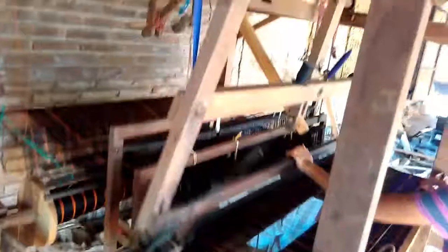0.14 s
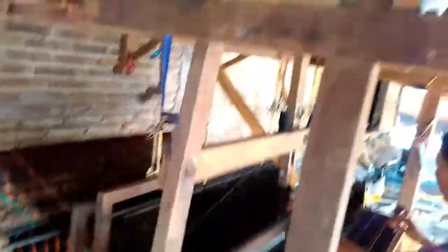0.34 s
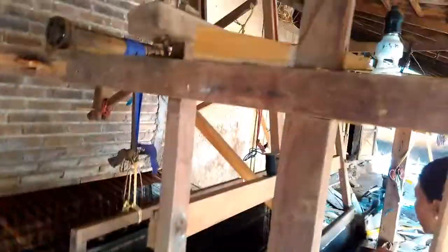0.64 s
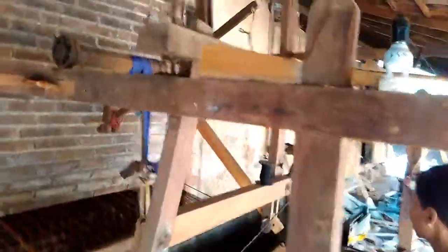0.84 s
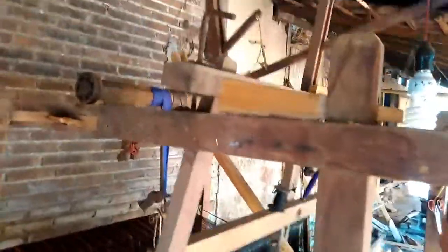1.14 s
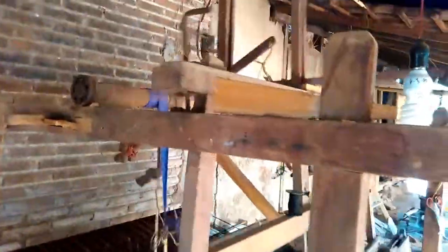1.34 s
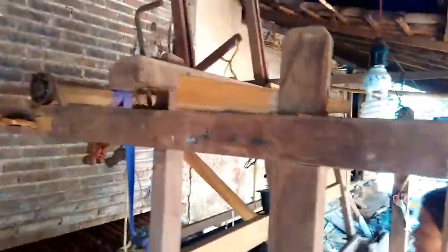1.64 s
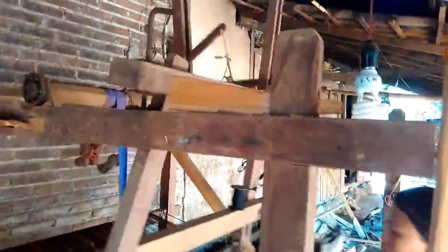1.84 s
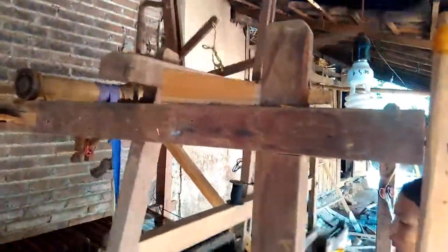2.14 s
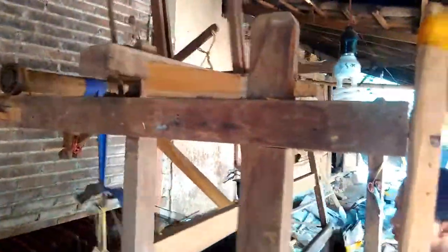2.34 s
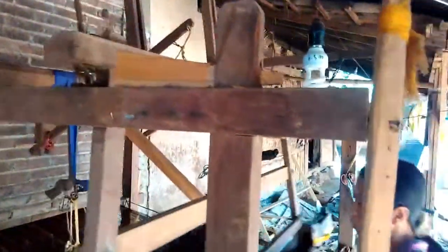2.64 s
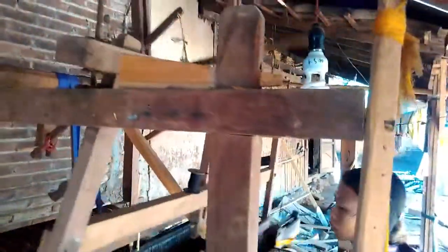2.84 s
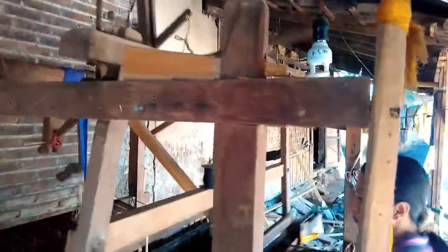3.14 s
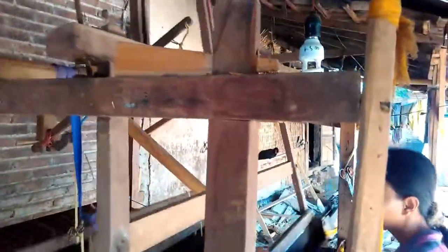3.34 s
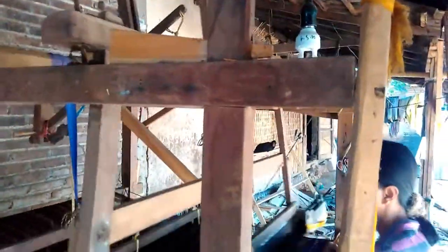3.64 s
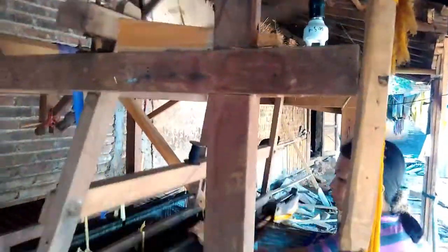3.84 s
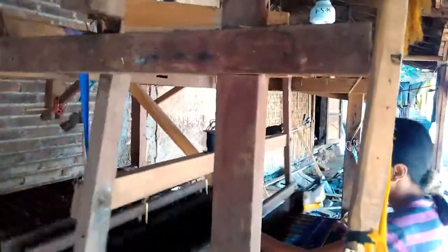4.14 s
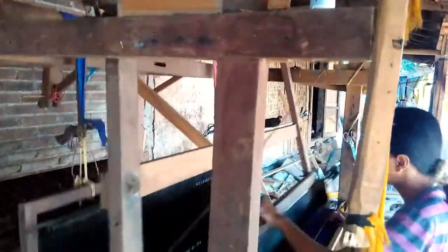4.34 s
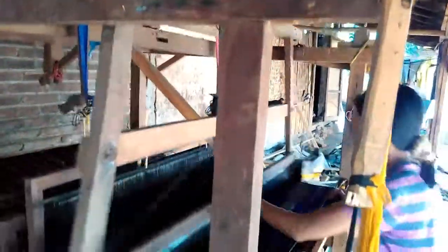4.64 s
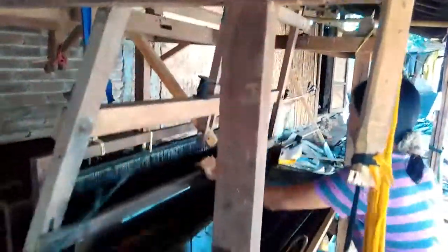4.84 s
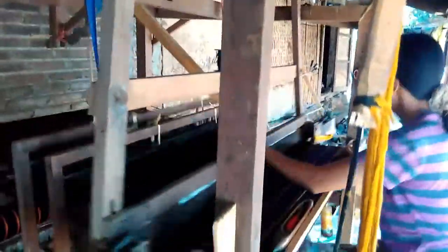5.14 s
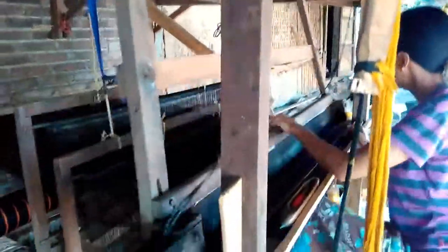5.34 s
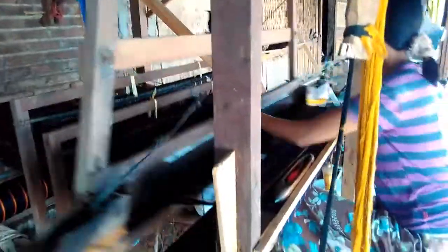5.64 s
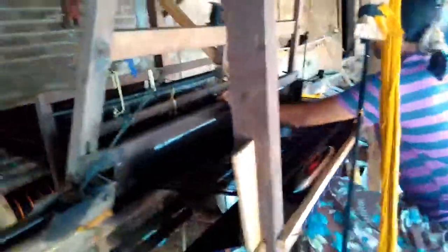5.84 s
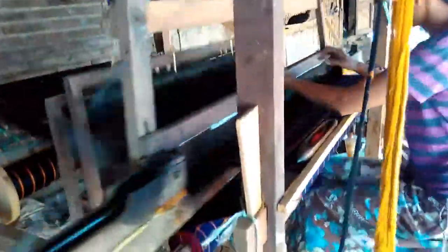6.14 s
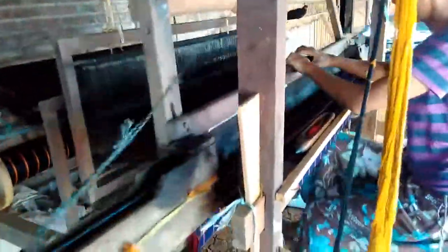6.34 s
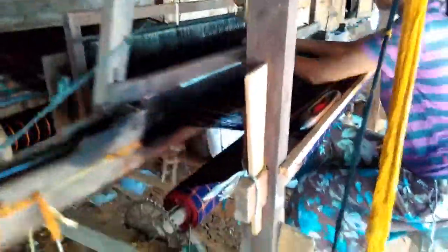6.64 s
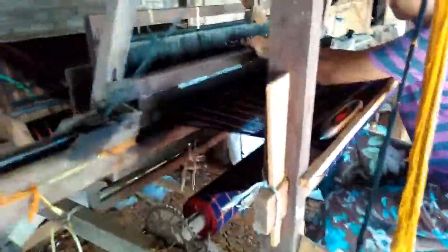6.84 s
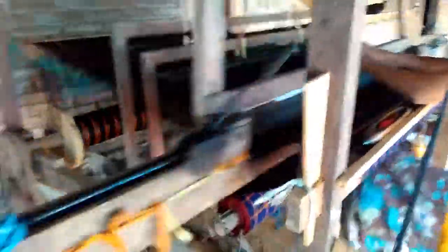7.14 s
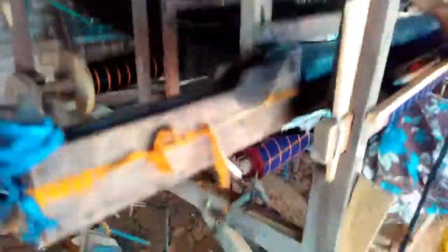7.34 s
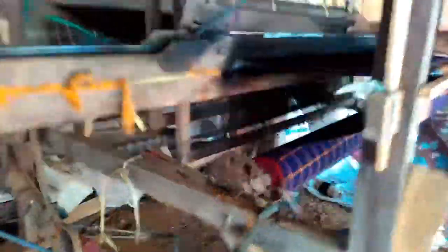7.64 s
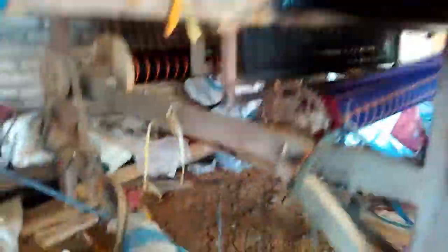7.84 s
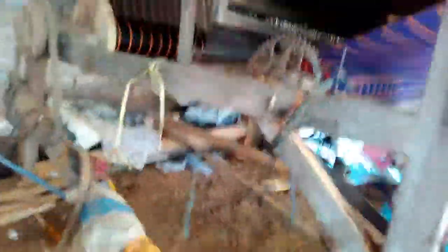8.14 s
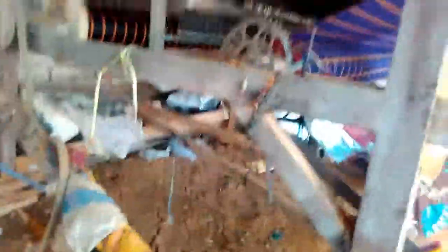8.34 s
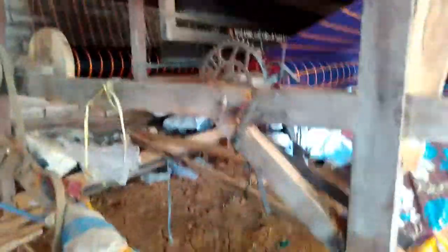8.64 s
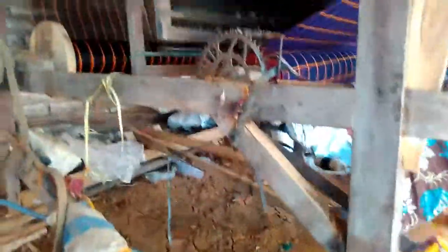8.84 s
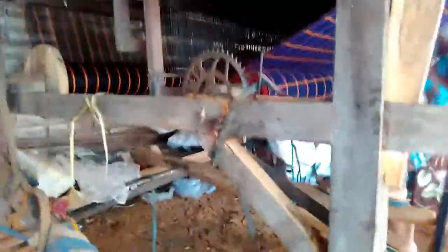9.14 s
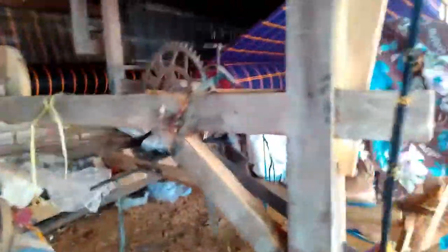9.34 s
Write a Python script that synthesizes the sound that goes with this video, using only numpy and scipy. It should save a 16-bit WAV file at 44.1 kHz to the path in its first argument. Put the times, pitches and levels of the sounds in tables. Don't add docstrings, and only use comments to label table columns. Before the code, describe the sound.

Fast, regular loom work, very close and dry with a short brick-room tail. Each cycle goes knock, skitter, sharp crack, then a heavier wooden slam with a quick double or triple clatter, then small ticks and a treadle drop. Steel reed and shuttle tip add brief high ringing. Quiet outdoor air fills the gaps, a distant low motor swelling later; stereo phone pickup distorts on peaks.

```python
import sys
import numpy as np
from scipy import signal
from scipy.fft import rfft, irfft
from scipy.io import wavfile
from scipy.ndimage import uniform_filter1d

SR = 44100
rng = np.random.default_rng(int(sys.argv[2]) if len(sys.argv) > 2 else 0)


def output_pcm(signal):
    pcm = np.clip(np.atleast_2d(signal).T, -1, 1) * 32767
    wavfile.write(sys.argv[1], SR, np.round(pcm).astype(np.int16))


def boost_factor(decibels):
    exponent = np.asarray(decibels, float) / 20
    return 10 ** exponent


N = 418068

# pitch_hz, t60_s
WIRES = [(7288, .12), (8226, .06), (8851, .12), (9834, .07), (11000, .06), (11548, .08), (12350, .07),
         (13071, .08), (13389, .09), (14149, .04)]
# start_s, blow_db, steel_re_wood_db, chatter_t60_s
LANDING = [
    (0.166, -7.5, 1.5, 0.18),
    (1.124, -1.5, -3.5, 0.14),
    (2.0936, -8.5, 2, 0.17),
    (3.043, 0, -2.5, 0.13),
    (4.01, -5.5, 0.5, 0.12),
    (4.974, 1, -5.5, 0.11),
    (5.939, -7.5, 0, 0.24),
    (6.89, 2.5, -3, 0.054),
    (7.863, 0.5, -3, 0.033),
    (8.817, -0.5, -2.5, 0.12),
]
# start_s, blow_db, steel_re_wood_db, chatter_t60_s
SLAM = [
    (.404, 0, -20.5, 0.1),
    (2.337, -1.5, -1.5, 0.087),
    (4.243, 1, -1, 0.067),
    (6.184, 0.5, -2.5, 0.06),
    (8.109, 0.5, -6.5, 0.094),
]


def unit(x):
    return x / np.sqrt(np.mean(x ** 2) + 1e-20)


def colour(x, points):
    size = 1024
    hz, db = np.transpose(points)
    bins_hz = np.maximum(np.fft.rfftfreq(size, 1 / SR), 1)
    gain_db = np.interp(np.log(bins_hz), np.log(hz), db)
    cep = irfft(np.log(boost_factor(gain_db)))
    cep[1:size // 2] *= 2
    cep[size // 2 + 1:] = 0
    taps = irfft(np.exp(rfft(cep)))[:size // 2]
    return signal.oaconvolve(x, taps[None] / np.linalg.norm(taps), axes=1)[:, :N]


def butter(x, order, hz, kind):
    return signal.sosfilt(signal.butter(order, hz, kind, fs=SR, output="sos"), x)


def fade(t, t60_s):
    return np.exp(-np.log(1000) * t / t60_s)


def curve(rows):
    start_s, level_db = np.transpose(rows)
    return np.interp(np.arange(N) / SR, start_s, level_db)


def wander(hold):
    held = np.repeat(rng.standard_normal(N // hold + 1), hold)[:N]
    return uniform_filter1d(held, hold // 2)


def grit(shape, spread_db):
    jumps = np.minimum(rng.exponential(size=(shape[0], shape[1] // 48 + 1)), 3)
    sizes = boost_factor(np.minimum(spread_db, 3) * jumps)
    return unit(rng.standard_normal(shape) * np.repeat(sizes, 48, axis=1)[:, :shape[1]])


def ring(modes, t, scatter_db, detune):
    hz, t60_s = np.transpose(modes)[:, :, None]
    size, slip = rng.standard_normal((2, len(modes), 1))
    phase = rng.uniform(0, 2 * np.pi, (2, len(modes), 1))
    waves = np.sin(2 * np.pi * hz * (1 + detune * slip) * t + phase)
    out = np.sum(boost_factor(scatter_db * size) * fade(t, t60_s) * waves, axis=1)
    return out / np.linalg.norm(out, axis=1, keepdims=True)


def outdoor_air(loom):
    # pitch_hz, level_db
    air_gain = [(30, 5), (87, 11.5), (346, 17.5), (978, 5.5), (1200, 4), (5170, -10), (11000, 0.5),
                (14500, -11)]
    air = boost_factor(-41.5) * colour(rng.standard_normal((2, N)), air_gain)
    duck_db, duck_above_db, duck_s = -6.5, -30.5, 0.091
    busy = uniform_filter1d(np.abs(loom[0]), int(duck_s * SR)) / boost_factor(duck_above_db)
    gust_db = 2.5 * wander(SR // 12)
    bass_gain = boost_factor(duck_db * busy / (1 + busy) + gust_db - 2.5)
    return bass_gain * butter(air, 2, 450, "low") + butter(air, 2, 450, "high")


def drone():
    # start_s, level_db
    swell = [(5.3, -58), (5.6, -57), (5.95, -55), (6.25, -54), (6.4, -43.5), (6.85, -41), (7.1, -62),
             (7.45, -47), (7.8, -52), (8.0, -59), (8.6, -57), (9.1, -60), (9.3, -44), (9.48, -45)]
    pitch_hz = 167.5
    return boost_factor(curve(swell)) * np.sin(2 * np.pi * pitch_hz * np.arange(N) / SR)


def shaking():
    shake_db = [-34, -29.5, -28, -33, -35, -61, -34, -29, -51, -27]
    flight_s = 0.1
    rest_db, rest_lead_s, swing_s = -57, 0.12, 0.14
    picks_s = [row[0] - flight_s for row in LANDING]
    rows = []
    for start_s, peak_db in zip(picks_s, shake_db):
        rows += [(start_s - rest_lead_s, rest_db), (start_s + swing_s, peak_db)]
    next_pick_s = 2 * picks_s[-1] - picks_s[-2]
    return rows + [(next_pick_s - rest_lead_s, rest_db)]


def rattle(wood_gain, steel_gain):
    hold = int(SR / 70)
    wood_db = 6.2 * wander(hold) - 6.5
    steel_db = 6.6 * wander(hold) - 2.5
    wood = boost_factor(wood_db) * colour(grit((2, N), spread_db=7.6), wood_gain)
    steel = boost_factor(steel_db) * colour(grit((2, N), spread_db=8.5), steel_gain)
    return boost_factor(curve(shaking())) * (wood + steel)


def strikes():
    # start_s, blow_db, steel_re_wood_db, chatter_t60_s
    picker = [
        (.065, -20.5, -7, 0.28),
        (1.031, -16, -4, 0.15),
        (1.992, -17, -6, 0.21),
        (2.946, -14.5, -9, 0.073),
        (3.909, -19.5, -6, 0.4),
        (4.884, -18.5, -14, 0.074),
        (5.837, -22.5, -7, 0.5),
        (7.759, -20.5, -2, 0.24),
        (8.724, -18, -2.5, 0.27),
    ]
    # start_s, blow_db, steel_re_wood_db, chatter_t60_s
    race = [(.105, -14.5, -4.5, 0.043), (1.054, -17.5, -14, 0.23), (1.1, -23, -28, 0.076),
            (2.03, -17, -9.5, 0.042), (2.966, -18.5, -10, 0.24), (3.003, -19, -12, 0.1),
            (3.948, -18, -7.5, 0.079), (4.899, -18.5, -14, 0.3), (4.932, -24, -4, 0.13),
            (4.955, -15.5, -27, 0.061), (5.877, -23, -4, 0.22), (6.817, -17.5, -19, 0.2),
            (6.846, -22.5, 3, 0.069), (6.872, -21, -23, 0.13), (7.798, -15.5, -11, 0.096),
            (7.834, -28.5, 0, 0.75), (8.774, -15.5, -14, 0.05), (8.795, -26, -34, 0.21)]
    # start_s, blow_db,
    # steel_re_wood_db, chatter_t60_s
    rebound = [(.225, -14.5, -1, 0.01), (1.176, -30, -5, 0.053), (1.236, -34, 10, .06),
               (2.116, -9, -15, 0.11), (2.179, -29.5, 8, 0.076), (3.161, -25.5, 6, 0.13),
               (4.04, -5, -1.5, 0.035), (5.103, -23.5, 5, .06), (6.028, -24, 4, 0.17),
               (6.795, -15, 1.5, 0.1), (7.002, -21, 5, 0.041), (7.97, -21, 6, 0.018),
               (8.875, -15, 3, 0.091), (8.911, -17, -19, 0.19)]
    # start_s, blow_db, steel_re_wood_db, chatter_t60_s
    skew = [
        (1.361, -10.5, -19, 0.28),
        (1.374, -12.5, -1, 0.33),
        (3.289, -12, -29, 0.2),
        (3.303, -11.5, -3.5, 0.42),
        (5.227, -10.5, -6, 0.28),
        (5.236, -15.5, 2.5, 0.53),
        (7.126, -11, -23, 0.34),
        (7.147, -6, -0.5, 0.12),
        (9.059, -11, -31, 0.081),
        (9.074, -10.5, -5.5, 0.31),
    ]
    # start_s, blow_db, steel_re_wood_db, chatter_t60_s
    cap = [(.255, -25.5, 8, .12), (.454, -1, -7, 0.17), (.541, -5.5, -11, 0.055), (1.421, -6, -4, .25),
           (2.38, -4.5, -4.5, 0.17), (3.337, -5, -8, 0.3), (4.285, -5.5, -3, 0.26),
           (5.279, -10.5, -22, 0.65), (6.222, -6, -4.5, 0.35), (6.315, -10, -3, 0.13),
           (7.191, -0.5, -2.5, 0.042), (8.147, -5, -4.5, 0.25), (8.242, -8.5, -8, 0.11),
           (9.12, -5.5, -4.5, 0.15), (9.206, -15, -15, 0.2)]
    # start_s, blow_db, steel_re_wood_db, chatter_t60_s
    bounce = [(.501, -4, -5.5, .06), (1.5, -10.5, -10.5, 0.18), (2.426, -7, -17, 0.1),
              (2.458, -10.5, -12, 0.22), (3.425, -10.5, -21, 0.11), (3.443, -13, -9, 0.1),
              (4.339, -7, -15, 0.076), (4.357, -7, -9.5, 0.13), (5.337, -13, -12, 0.11),
              (6.276, -12.5, -5, 0.19), (6.333, -13, -8, 0.1), (7.277, -14, -12, 0.25),
              (8.202, -12, -3.5, 0.24), (9.136, -24, -20, 0.38), (9.178, -20, -21, 0.26)]
    # start_s, blow_db, steel_re_wood_db, chatter_t60_s
    treadle = [
        (.7265, -20.5, -7.5, 0.18),
        (1.687, -31, 2.5, 0.15),
        (2.647, -26, -3, 0.17),
        (3.597, -29.5, -1, 0.23),
        (4.568, -19, -9, 0.14),
        (5.526, -31.5, -2, 0.33),
        (6.492, -17.5, -7, 0.1),
        (7.468, -30.5, -2, 0.17),
        (8.424, -19.5, -11, 0.16),
        (9.404, -37, 2, 0.076),
    ]
    # start_s, blow_db, steel_re_wood_db, chatter_t60_s
    snaps = [(.4065, -4.5, 1, 0.018), (.482, -10, -20, .03), (.192, -11, -7, 0.094), (5.003, -8, -8, .04),
             (1.176, -14.5, 2.5, 0.05), (2.408, -3.5, -9, 0.011), (3.095, -18, 4.5, 0.083),
             (4.358, -5, -7, 0.021), (4.395, -14.5, -5, 0.046), (5.033, -14, -4, 0.037),
             (5.879, -28, -15, .02), (6.052, -37, 5, 0.018), (6.18, -11, -21, 0.046),
             (6.343, -16, -20, 0.057), (6.818, -10.5, -12, 0.02), (6.945, -15.5, -5, 0.054),
             (8.796, -16, -25, 0.014), (8.876, -13.5, -1, 0.024), (9.078, -8, -13, 0.018),
             (4.582, -29, -23, 0.099), (1.932, -41, -20, 0.037)]
    # start_s, knock_db, chatter_t60_s
    slats = [(.336, -25.5, 0.19), (1.259, -26, 0.23), (1.303, -27, 0.33), (2.56, -37, 0.96),
             (2.603, -28, 0.25), (2.627, -27, 0.067), (3.222, -22.5, 0.098), (3.56, -28, 0.26),
             (4.486, -36, 0.14), (4.497, -33.5, 0.49), (4.551, -29, 0.17), (5.15, -26, 0.23),
             (5.47, -50, 0.065), (5.485, -36, 0.25), (8.397, -23, 0.037)]
    # start_s, knock_db, chatter_t60_s
    thuds = [(.392, -28, .05), (.613, -18.5, 0.028), (.933, -33.5, 0.16), (3.213, -20, 0.058),
             (4.176, -20.5, 0.099), (4.667, -34, .04), (4.814, -48, 0.097), (6.105, -20, 0.065),
             (6.121, -39, 0.044), (7.075, -24.5, 0.21), (8.28, -23, 0.045), (8.625, -33, 0.096),
             (8.995, -15, 0.044)]
    # start_s, knock_db, chatter_t60_s
    rods = [(6.442, -26, 0.45), (1.636, -28, 0.44), (5.651, -38.5, 0.25), (5.786, -35, 0.24),
            (7.362, -31, 0.48), (7.41, -27.5, 0.46), (7.547, -44, 0.066), (7.707, -36, 0.049),
            (7.736, -39, 0.1), (8.031, -23.5, 0.15), (8.328, -34, 0.41), (9.319, -31, 0.16)]
    # start_s, knock_db, chatter_t60_s
    pulleys = [(.686, -24, 0.31), (.844, -34, 0.076), (.97, -31, 0.047), (1.66, -26, 0.15),
               (1.93, -25, 0.079), (2.26, -26, 0.22), (2.745, -40.5, 0.3), (2.892, -36, 0.085),
               (3.688, -36.5, 0.23), (3.808, -39, 0.032), (3.851, -31.5, 0.21), (4.157, -28.5, .07),
               (4.524, -26.5, 0.34), (4.867, -40, 0.044), (7.66, -39, 0.049), (9.331, -30, 0.48)]
    # start_s, knock_db, chatter_t60_s
    heddles = [(.021, -29.5, 0.052), (.312, -34, 0.12), (1.711, -38, 0.062), (1.768, -34, 0.027),
               (1.801, -37, 0.05), (4.707, -45, 0.049), (5.612, -49, 0.4), (6.597, -47, 0.051),
               (6.621, -39, 0.081), (6.706, -40, 0.1), (7.574, -45, 0.082), (8.38, -30, 0.076),
               (8.519, -55, 0.051), (8.535, -34.5, 0.069), (8.551, -45, 0.079), (8.678, -34, 0.15)]
    # events, rise_s, pitch_hz, crack_db
    hard_parts = [(picker, 0.0055, 4530, -11), (race, 0.0012, 1093, -1), (LANDING, 0.0015, 3325, -18),
                  (rebound, 0.0045, 2280, -1.1), (SLAM, 0.0059, 990, -5.5), (skew, 0.0079, 1277, -5),
                  (cap, 0.0061, 3860, 0), (bounce, 0.0059, 2270, -1), (treadle, 0.00067, 1100, 9.8),
                  (snaps, 0.001, 2380, 0)]
    # events, pitch_hz, steel_re_wood_db of a middling knock, rise_s, crack_db
    soft_parts = [(slats, 920, -0.92, 0.0038, 9.3), (thuds, 886, -39, 0.0072, 2.4),
                  (rods, 1475, -1.6, 0.0056, 12), (pulleys, 1600, -0.48, 0.006, 2.9),
                  (heddles, 1660, 3.7, 0.002, 2.7)]
    middling_db, steel_per_db = -32, -0.47
    out = [(*row, *part) for rows, *part in hard_parts for row in rows]
    for rows, pitch_hz, steel_db, rise_s, crack_db in soft_parts:
        for start_s, db, t60_s in rows:
            lean_db = steel_per_db * (db - middling_db)
            out.append((start_s, db, steel_db + lean_db, t60_s, rise_s, pitch_hz, crack_db))
    out = np.array(out)
    out[:, -2] *= 1 + 0.05 * rng.standard_normal(len(out))
    return out


def blows(wood_gain, steel_gain):
    # pitch_hz, t60_s
    beam_modes = [(590, .05), (820, .04), (965, .06), (1350, .04), (1750, .05), (2350, .03), (3090, .03),
                  (4130, .025)]
    # pitch_hz, level_db
    frame_gain = [(20, -9), (60, -8), (130, -14), (350, -0.5), (650, 0.5), (950, 1), (1300, -17),
                  (2500, -54)]
    crack_t60_s, thump_t60_s = 0.0061, 0.15
    room_t60_s, room_db = 0.25, -8
    loose_db, loose_t60_s, loose_hz_range = -4, 0.016, (900, 13000)
    wood, steel, rings, thump = np.zeros((4, 2, N + SR))
    t = np.arange(SR // 4) / SR
    short = t[:1536]
    echo = boost_factor(room_db) * np.minimum(t / 0.015, 1) * fade(t, room_t60_s)
    for start_s, db, steel_db, t60_s, rise_s, hz, crack_db in strikes():
        chatter = np.minimum(t / rise_s, 1) * fade(t, t60_s)
        crack = boost_factor(crack_db) * np.minimum(t / 0.00093, 1) * fade(t, crack_t60_s)
        direct = (chatter + crack) * grit((2, len(t)), spread_db=1.0)
        hit = boost_factor(db) * (direct + echo * grit((2, len(t)), spread_db=-2.0))
        part_modes = [(hz, 24 / hz), (0.8 * hz, 12 / hz), (1.3 * hz, 16 / hz)]
        part = ring(part_modes, short, scatter_db=2, detune=0.01)
        beams = ring(beam_modes, short, scatter_db=3, detune=0.02)
        wires = ring(WIRES, short, scatter_db=3.5, detune=0.001)
        loose_hz = np.exp(rng.uniform(*np.log(loose_hz_range), size=12))
        loose = ring([(f, loose_t60_s) for f in loose_hz], short, scatter_db=3, detune=0)
        body = boost_factor(-8.0 - 0.16 * db) * part + boost_factor(-12.0) * beams
        body = body + boost_factor(steel_db - 12.5 + 0.97 * db) * wires + boost_factor(loose_db) * loose
        rung = signal.fftconvolve(hit, body, axes=1)
        i = int(start_s * SR)
        wood[:, i:i + len(t)] += hit
        steel[:, i:i + len(t)] += boost_factor(steel_db) * hit
        thump[:, i:i + len(t)] += boost_factor(0.13 * db) * fade(t, thump_t60_s) * hit
        rings[:, i:i + rung.shape[1]] += rung
    clatter = boost_factor(-4.0) * colour(wood, wood_gain) + boost_factor(2.5) * colour(steel, steel_gain)
    clatter = butter(clatter, 2, 237, "high")
    return clatter + boost_factor(-9.0) * colour(thump, frame_gain) + butter(rings[:, :N], 3, 450, "high")


def knocks():
    # start_s, level_db, pitch_hz, t60_s
    beam_ends = [(0.403, -14, 972, 0.15), (.46, -16, 2030, .04), (.7265, -14.5, 950, 0.067),
                 (.7268, -21, 2800, .06), (1.375, -13, 1310, .06), (2.034, -19, 1007, 0.071),
                 (2.275, -28, 1170, .05), (2.429, -10, 1020, 0.072), (3.291, -13.5, 1260, 0.053),
                 (4.244, -9, 995, .08), (4.358, -9, 2370, 0.041), (4.569, -14.5, 1063, 0.05),
                 (4.59, -24, 970, 0.06), (4.9, -19, 1020, 0.071), (4.99, -9, 1600, .06),
                 (5.879, -21.5, 1040, 0.03), (6.11, -28, 1500, .06), (6.181, -21, 1100, .04),
                 (6.342, -24, 2070, 0.035), (6.4925, -12.5, 1107, 0.024), (6.495, -20, 1384, 0.2),
                 (4.815, -40, 1000, .12), (4.79, -45, 2380, .15), (7.801, -22, 1260, .08),
                 (6.817, -18.5, 1250, .05), (7.131, -15, 1293, 0.071), (8.11, -15, 1800, 0.07),
                 (8.425, -28, 1325, .07), (8.427, -25, 2380, .06), (8.797, -27, 2540, .03),
                 (9.064, -14, 1310, .07), (0.167, -9, 2400, 0.074), (0.106, -25, 1190, .05)]
    out = np.zeros((2, N + SR))
    t = np.arange(SR // 8) / SR
    for start_s, db, hz, t60_s in beam_ends:
        modes = [(hz, t60_s), (1.07 * hz, 0.6 * t60_s), (0.9 * hz, 0.5 * t60_s)]
        note = ring(modes, t, scatter_db=2, detune=0.003)
        i = int(start_s * SR)
        out[:, i:i + len(t)] += boost_factor(db) * np.minimum(t / 0.00072, 1) * note / np.std(note[:, :256])
    return out[:, :N]


def jingles():
    # pitch_hz, t60_s
    tip_modes = [(8100, .14), (9655, .14), (9685, .14), (10480, .05), (11390, .14), (11351, .14),
                 (12240, .06), (13221, .08), (14150, .05)]
    # start_s, level_db, length_s
    tip_shivers = [(.183, -11, 0.016), (.313, -34, .025), (.336, -34, .045), (1.075, -24, .03),
                   (1.385, -24, .03), (1.64, -35, 0.031), (1.689, -32, .02), (1.762, -42, .03),
                   (2.097, -19, 0.035), (2.264, -43, .03), (3.0, -22.5, 0.041), (3.223, -26, 0.016),
                   (3.325, -10, 0.036), (3.598, -30, .02), (3.688, -35, 0.018), (4.015, -11, 0.025),
                   (4.927, -20, 0.035), (5.153, -34, .035), (5.243, -7, .04), (5.528, -30, .02),
                   (5.614, -40, .02), (5.947, -13, 0.019), (6.07, -38, .04), (7.148, -10.5, 0.041),
                   (7.44, -34, .04), (7.87, -11, 0.033), (8.0, -32, .065), (.545, -29, .06),
                   (8.995, -31, .03)]
    reed_db, reed_s, catch_t60_s = -19, 0.04, 0.046
    out = np.zeros((2, N + SR))
    t = np.arange(SR // 8) / SR
    rows = [(*row, tip_modes) for row in tip_shivers]
    rows += [(row[0], reed_db, reed_s, WIRES) for row in SLAM]
    for start_s, db, length_s, modes in rows:
        shiver = fade(t, 3.0 * length_s) * grit((2, len(t)), spread_db=2.0)
        response = ring(modes, t, scatter_db=2.5, detune=0.001)
        rung = signal.fftconvolve(shiver, response, axes=1)[:, :len(t)]
        caught = fade(np.maximum(t - length_s, 0), catch_t60_s)
        i = int(start_s * SR)
        out[:, i:i + len(t)] += boost_factor(db) * rung / np.std(rung[:, :1536]) * caught
    return out[:, :N]


def scene():
    # pitch_hz, level_db
    wood_gain = [(300, -22), (700, 3.5), (1000, 1), (1400, 3), (2300, 3.5), (4200, 0), (5500, -9),
                 (8000, -14.5), (12000, -59)]
    # pitch_hz, level_db
    steel_gain = [(3000, -40), (5000, -3.5), (6300, 0), (7600, 1), (9600, 5.5), (11400, 3.5), (13000, -0.5),
                  (14200, -4.5), (15400, -26)]
    loom = rattle(wood_gain, steel_gain) + blows(wood_gain, steel_gain) + knocks() + jingles()
    return loom + outdoor_air(loom) + drone()


def band_limit(x):
    return signal.sosfilt(signal.butter(12, 15590, fs=SR, output="sos"), x)


def record(dry):
    # pitch_hz, level_db
    right_gain = [(60, -1.5), (1300, -1), (2400, 0), (4400, 0), (8100, -5), (15000, -6.5)]
    left, other = dry
    low, high = (signal.butter(1, 900, kind, fs=SR) for kind in ("low", "high"))
    shared = 0.93
    bass = shared * left + np.sqrt(1 - shared ** 2) * other
    right = signal.lfilter(*high, other) - signal.lfilter(*low, bass)
    right = boost_factor(-3.2) * colour(right[None], right_gain)[0]
    loud = np.clip(np.array([left, right]), -1.1, 1.1)
    loud = loud + 0.011 * uniform_filter1d(loud ** 2, size=96, axis=1)
    top = signal.ellip(10, 0.3, 80, 14250, fs=SR, output="sos")
    mix = np.clip(signal.sosfilt(top, loud), -1, 1)
    return band_limit(mix)


dry = scene()
out = record(dry)
output_pcm(out)
```